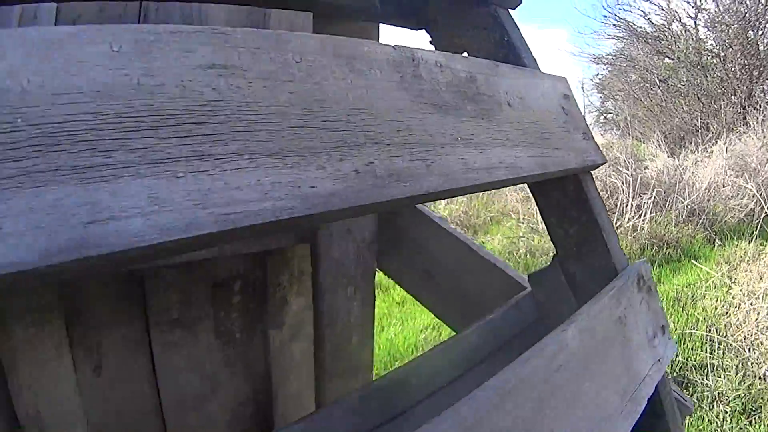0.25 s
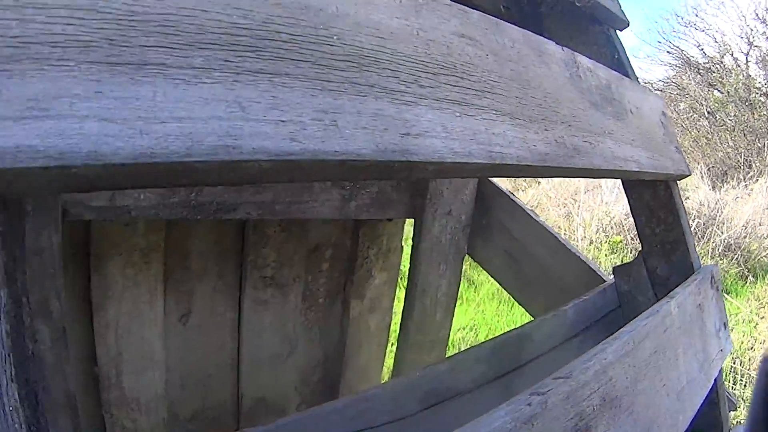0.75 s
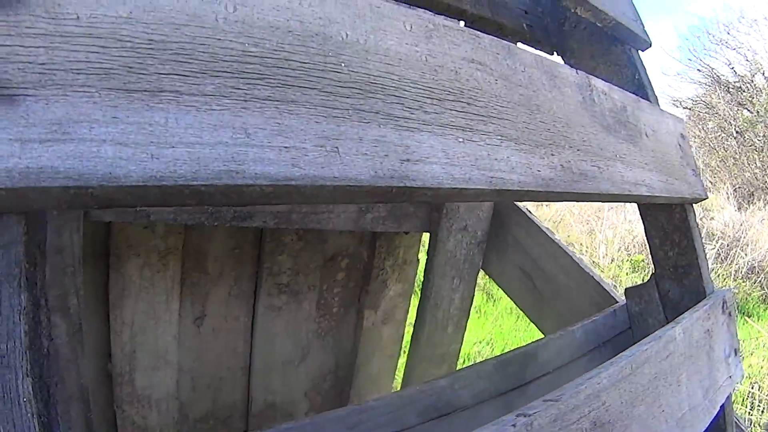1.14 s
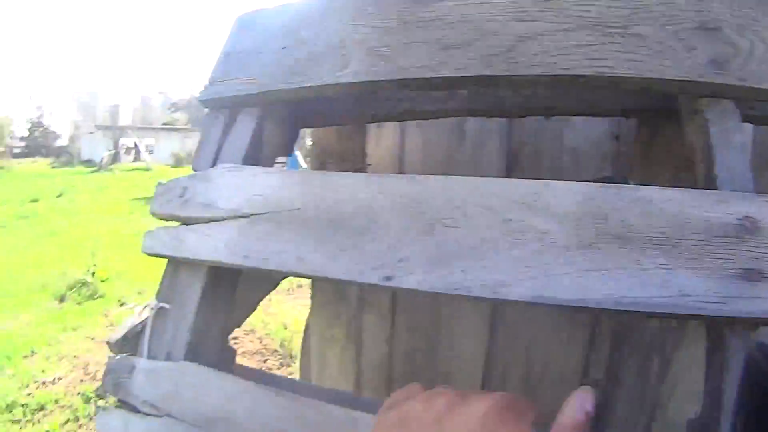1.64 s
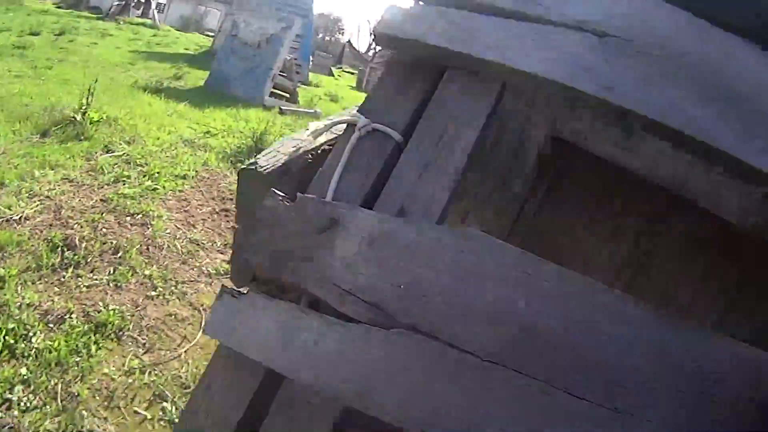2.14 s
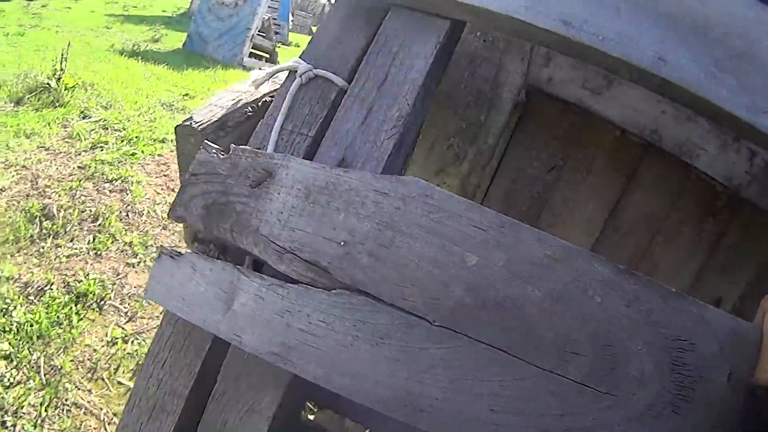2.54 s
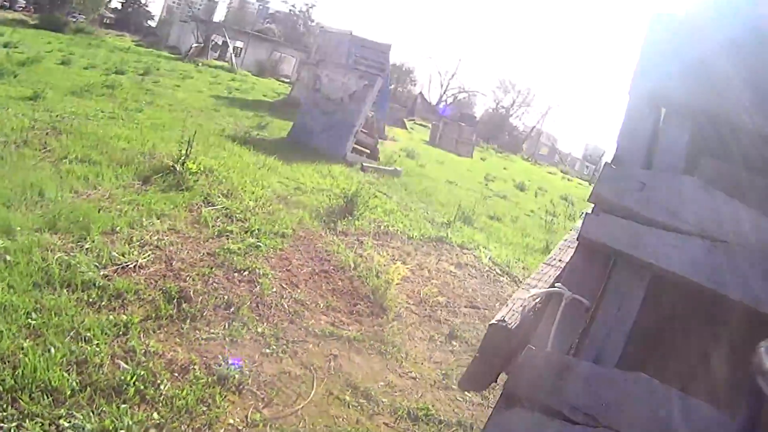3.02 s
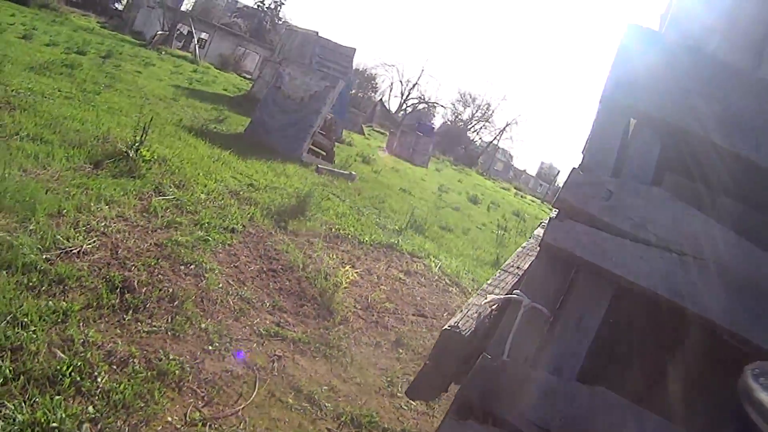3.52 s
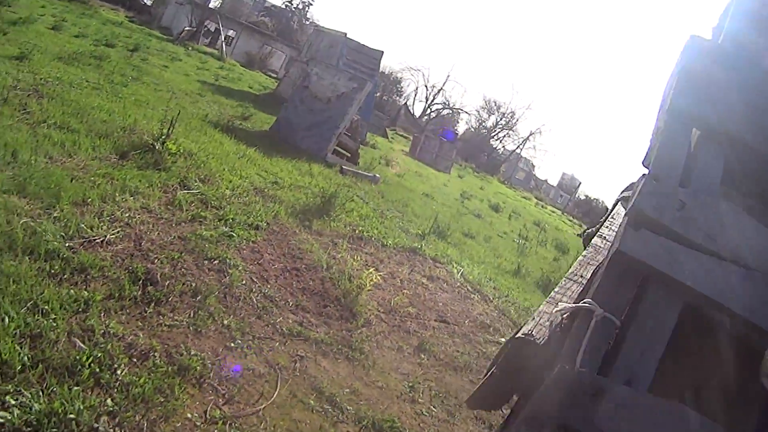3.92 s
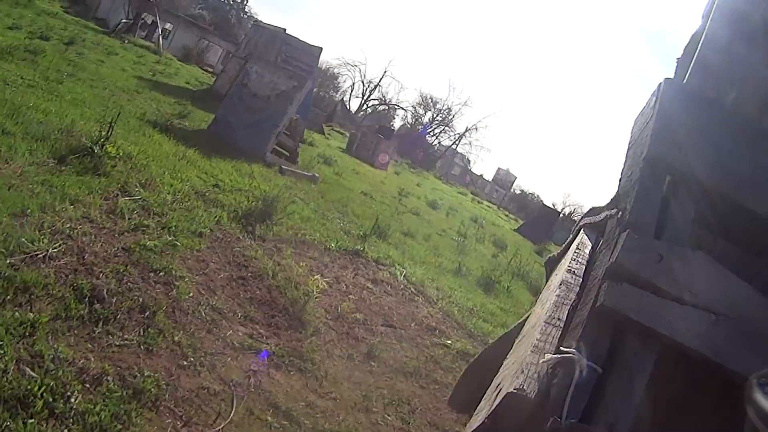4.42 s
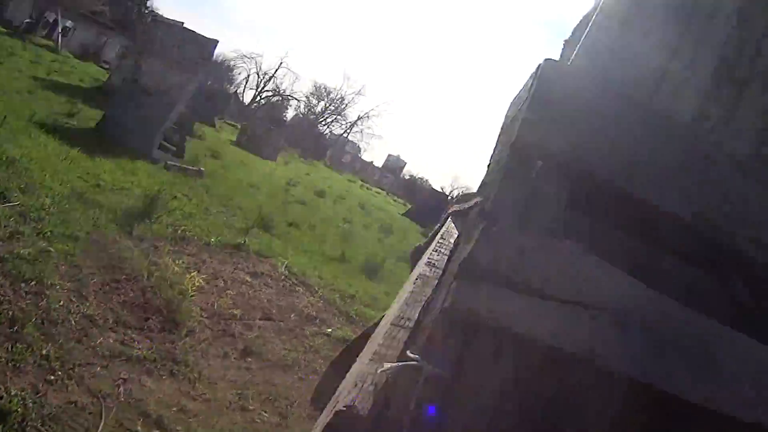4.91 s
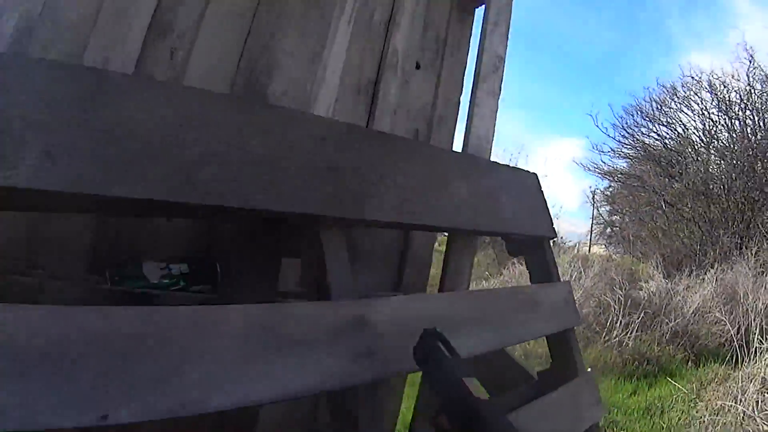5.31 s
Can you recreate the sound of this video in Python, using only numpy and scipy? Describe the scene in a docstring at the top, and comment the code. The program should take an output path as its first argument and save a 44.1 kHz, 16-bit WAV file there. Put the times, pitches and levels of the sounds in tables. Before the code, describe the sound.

Wind rumble, steady microphone hiss and cloth rustle run throughout, boxed in by a sealed head camera on an open field. In the first 0.7 seconds a dense cluster of hard knocks, dull thuds and dry ticks sounds as gear bumps wood, strongest around 0.3. It is calmer until about 1.4, with only faint bumps. From 1.5 to 3.0 the wind gusts, cloth rubs and knocks return, with a sharp clack near 2.3 and far shots ticking. At 3.2 a nearby air gun snaps with a low boom and quick echoes, followed by a heavy thud at 3.3. A second shot cracks at 3.7. Around 3.95 to 4.2 a short low hum rises and sinks, ending in a tiny falling squeak. The third, brighter shot comes at 4.4. Light bumps at 4.7 and 5.2 follow as the rustling and wind subside into hiss.

```python
"""A player with a sealed head camera crouches behind wooden pallets on an open field.
From the start microphone hiss, rumbling wind and rustling cloth run on as shaped noise.
Gear and pellets soon knock as ringing modes, dull thuds swell and fade, and far shots tick as noise bursts.
Later three nearby air guns snap, boom and echo; between the second and third of these shots
a short hum and a falling squeak glide by.
Two microphones hear it; noise filtered by case resonances makes the cloth and the shots ring."""
import sys
import numpy as np
from scipy import signal
from scipy.io import wavfile
from scipy.ndimage import uniform_filter1d

SR = 44100
rng = np.random.default_rng(int(sys.argv[2]) if len(sys.argv) > 2 else 0)


def to_wav(sig):
    """Store sig (one row per channel, or 1-D mono) as 16-bit WAV at the path in sys.argv[1].

    Samples outside -1..1 are clipped; the rate is SR.
    """
    pcm = np.clip(np.atleast_2d(sig), -1, 1) * 32767
    pcm = np.round(pcm).astype(np.int16)
    wavfile.write(sys.argv[1], SR, pcm.T)  # frames by channels


def convert_level_to_amplitude(level_db):
    """Map a level in decibels to its linear amplitude factor."""
    exponent = np.asarray(level_db, float) / 20
    return 10 ** exponent


N = 244975  # length in samples


def evened(x):
    """Scales to rms 1."""
    return x / np.sqrt(np.mean(x ** 2) + 1e-20)


def read(points, hz):
    """Reads a table of values against pitch, on a log-frequency axis."""
    table_hz, value = np.transpose(points)
    return np.interp(np.log(hz + 1), np.log(table_hz + 1), value)


def add(mix, s, sound):
    """Adds a two-channel sound at time s."""
    part = mix[:, round(s * SR):][:, :sound.shape[1]]
    part += sound[:, :part.shape[1]]


def ports(mid, side, pan_db=0.):
    """Sum and difference of the two microphone ports become left and right."""
    return np.array([(mid + side) * convert_level_to_amplitude(pan_db / 2), (mid - side) * convert_level_to_amplitude(-pan_db / 2)])


def noise(spectrum, patchy_db, size=1024):
    """Short-time spectrum of coloured noise with drifting louder and softer patches."""
    hz = np.fft.rfftfreq(size, 1 / SR)
    real, imaginary, patch = rng.standard_normal((N * 4 // size + 8, len(hz), 3)).T
    patch = uniform_filter1d(patch, size=5, axis=0)  # smooth over frequency
    patch = evened(uniform_filter1d(patch, size=6, axis=1))  # smooth over time
    return hz, (real + 1j * imaginary) * convert_level_to_amplitude(read(spectrum, hz)[:, None] + patchy_db * patch)


def to_wave(spectrum):
    """Turns a short-time spectrum back into samples."""
    size = 2 * (spectrum.shape[-2] - 1)
    return signal.istft(spectrum, nperseg=size, noverlap=size * 3 // 4)[1][..., :N]


# Colour of the steady hiss in the sum of the two ports.
# Each row: frequency in Hz, relative level in dB per Hz.
HISS_SUM = [(290, -38), (500, 4), (1600, 5.5), (2390, 0.5), (4680, -1), (5610, -1.5), (11000, -5.5),
            (14300, -107), (22000, -120)]
# The same for the difference of the ports.
# Each row: frequency in Hz, relative level in dB per Hz.
HISS_DIFFERENCE = [(240, -50), (400, -20), (706, -5), (1030, -6.5), (2490, -13), (3110, -15.5),
                   (11000, -29.5), (14300, -54), (22000, -120)]


def hiss():
    """The difference signal is boosted in the camera, so its hiss is the louder one."""
    mid = evened(to_wave(noise(HISS_SUM, patchy_db=2.5)[1]))
    side = evened(to_wave(noise(HISS_DIFFERENCE, patchy_db=2.7)[1]))
    return ports(convert_level_to_amplitude(-58.5) * mid, convert_level_to_amplitude(-55) * side)


def swells(rows, db):
    """Adds up the power of bell-shaped swells with their own rise and fall; returns a gain."""
    peak, rise, fall = np.transpose(rows)[:3, :, None]
    late = np.arange(N) / SR - peak
    u = late / np.where(late < 0, rise, fall)
    drop_db = 4.5 * u ** 2  # 4.5 dB down at one rise or fall time from the peak
    return np.sqrt((convert_level_to_amplitude(db[:, None] - drop_db) ** 2).sum(0))


# Colour of the wind heard through the case.
# Each row: frequency in Hz, relative level in dB per Hz.
WIND_COLOUR = [(12, -77), (20, -20.5), (70, -5), (172, -5), (241, 0.5), (307, -6), (370, -16.5), (426, -21),
               (600, -29.5), (780, -34.5), (1320, -120)]
# How strongly the wind differs between the ports, before its shared and separate parts are weighted.
# Each row: frequency in Hz, difference in dB relative to the sum.
WIND_DIFFERENCE = [(30, -12), (80, -18), (200, -15), (300, -11), (450, 6.5)]
# Gusts on top of a steady breeze.
# Each row: peak time in seconds, rise in seconds, fall in seconds, level in dB.
GUSTS = [(.55, .5, 0.97, -46), (1.05, 0.027, 0.052, -59), (1.58, .12, 0.1, -40), (2.4, 0.55, 0.32, -40),
         (3.35, 0.43, 0.23, -41), (3.92, 0.19, 0.052, -38), (4.27, 0.22, 0.072, -43),
         (4.85, 0.42, 0.16, -43.5)]


def wind():
    """Lumpy low noise; the two ports share most of it, slightly out of step."""
    hz, shared = noise(WIND_COLOUR, patchy_db=1.5, size=2048)
    separate = noise(WIND_COLOUR, patchy_db=2.5, size=2048)[1]
    out_of_step = 0.77 * np.exp(1j * 1.06) * shared  # turned by 1.06 rad
    side = convert_level_to_amplitude(read(WIND_DIFFERENCE, hz))[:, None] * (out_of_step + 0.3 * separate)
    mid, side = to_wave(np.array([shared, side]))
    breeze_db = -48
    strength = np.hypot(convert_level_to_amplitude(breeze_db), swells(GUSTS, np.transpose(GUSTS)[3]))
    return ports(mid, side) / mid.std() * strength


def scattered(shape, per_s, spread_db, share, length):
    """Noise roughened by sparse bursts of uneven size, each dying at a rate set by length in seconds."""
    size = convert_level_to_amplitude(spread_db * np.minimum(rng.exponential(1, shape[1]), 4))
    bursts = size * (rng.random(shape[1]) < per_s / SR)
    roughness = signal.lfilter([1], [1, -np.exp(-1 / (length * SR))], bursts)
    return rng.standard_normal(shape) * (1 + share * roughness)


def resonate(x, hz, width):
    """A resonant band of gain 1 at its centre."""
    return signal.lfilter(*signal.iirpeak(hz, hz / width, SR), x)


# Resonances of the camera case, the lowest first; a second pass scales each width.
# Each row: frequency in Hz, width of the first pass in Hz, level in dB.
CASE = [(1563, 330, -1.5), (3260, 710, 8), (4890, 720, 6.5), (5200, 540, 13), (7730, 1400, 2.5),
        (7230, 1200, -7.5)]
# Neighbours of the lowest resonance, filtered in the same way.
# Each row: frequency in Hz, width of the first pass in Hz, level in dB.
SNAP_PARTNERS = [(1709, 55, -6), (1050, 137, -10)]
# Resonances heard in the difference of the two ports.
# Each row: frequency in Hz, width in Hz, level in dB.
PORT_GAP = [(1640, 500, 1), (2800, 1550, -1), (5100, 1100, -5.5), (8000, 3000, -26)]


def through_case(x, snap_gain, bright_gain=0.69):
    """Airborne sound excites the case resonances; the gains weigh the lowest one and the upper ones."""
    x = signal.lfilter(*signal.butter(1, 9500, fs=SR), x)
    snap = sum(convert_level_to_amplitude(db) * resonate(resonate(x[0], hz, width), hz, 0.8 * width)
               for hz, width, db in [CASE[0]] + SNAP_PARTNERS)
    bright = sum(convert_level_to_amplitude(db) * resonate(resonate(x[0], hz, width), hz, 4 * width)
                 for hz, width, db in CASE[1:])
    side = sum(convert_level_to_amplitude(db) * resonate(x[1], hz, width) for hz, width, db in PORT_GAP) / bright.std()
    bright = evened(bright)
    mid = snap_gain * convert_level_to_amplitude(CASE[0][2]) * evened(snap) + bright_gain * bright
    return ports(mid, bright_gain * side), bright


# The player's moves, each a swell of rubbing cloth and straps; levels are those fed to the case.
# Each row: peak time in seconds, rise in seconds, fall in seconds, level in dB,
# upper resonances in dB relative to that level.
MOVES = [(.3, 0.17, 0.21, -52, -19), (.55, 0.094, 0.14, -54.5, -9), (1.6, 0.14, 0.068, -53, -6),
         (1.9, 0.13, 0.27, -52.5, -9), (2.15, 0.12, 0.19, -49, -8), (2.8, 0.25, 0.33, -55, -8.5),
         (3.12, 0.23, 0.26, -51, -5), (4.3, 0.17, 0.088, -50.5, -5.5), (4.75, 0.14, 0.48, -58, -17),
         (5.3, 0.37, 0.62, -66, -1)]


def rustle():
    """Noise with small crackles in it, rising and falling with the player's moves."""
    rub = scattered((2, N), 140, spread_db=5.0, share=0.44, length=0.00068)
    db, upper_db = np.transpose(MOVES)[3:]
    return through_case(rub, swells(MOVES, db), swells(MOVES, db + upper_db))[0]


# Knocks on wood and gear; the level is before a common 3 dB lift.
# Each row: time in seconds, level in dB, edge modes in dB and snap modes in dB relative to it,
# contact time in ms (at least 1 is used).
KNOCKS = [(0.012, -41.5, -20, -14, 4.2), (.136, -37, -18, 4.5, 4), (0.179, -42, -11, -22, 8.4),
          (0.283, -15, -14, -13.5, 8.1), (0.314, -45.5, 19, 3, 7.1), (0.343, -13.5, -13, -13, 2.58),
          (0.371, -26, -28, -30, 6.3), (.415, -40.5, -11, -9, 3.2), (0.632, -32, -5.5, -30, 8.6),
          (0.725, -46, -10, -6, 3.1), (1.419, -54, 0, 5, 7.7), (1.4927, -21, -4, -9, 9.5),
          (1.504, -34, 2, -16, 3.3), (1.542, -47.5, 23, 7, 5.5), (1.756, -36.5, 4, -0.5, 9.9),
          (1.787, -42.5, -12, -1, 2.2), (1.834, -39.5, 5.5, -11, 7.1), (1.962, -49, 0, 15, 8.2),
          (1.97, -51.5, 12, 12, 2.9), (2.203, -25, -17, 1, 3.5), (2.297, -14, -10.5, -8, 2.4),
          (2.357, -48, 18.5, 9.5, 6.8), (2.443, -47, -14, -5.5, 8.4), (2.588, -38.5, -45, -17, 6),
          (2.737, -44.5, -14, -7, 10), (2.777, -28, -7, -2.5, 3.83), (3.024, -25, -6, -12.5, 8.95),
          (3.303, -34.5, -21, -9, 7.5), (3.312, -34, -14, -34, 7.6), (3.378, -27, -11, -25, 3.38),
          (3.883, -23, -8, -16.5, 7.4), (3.894, -37, -20, -7, 8.5), (3.924, -40, -1, -8, 2.5),
          (4.739, -43, -1, -13, 9.2), (4.895, -43.5, -24, -23, 6.5), (5.148, -28, -4, -18, 6.3),
          (5.238, -40, -25, -30, 5)]
# The modes a knock rings with; pitch and level vary a little from knock to knock.
# Each row: frequency in Hz, level in dB, time to fall 60 dB in seconds,
# difference of the ports in dB relative to their sum, phase of that difference in rad.
KNOCK_MODES = [(240, -9, 0.042, -33, 2.3), (289, -6.5, 0.036, -1, 0.38), (393.5, -3.5, 0.029, -3.5, 2.95),
               (532, -5.5, 0.024, 1, 1.4), (663, -11, 0.015, 0, 1.3), (860, -14.5, 0.027, -5, 1.5),
               (1136, -14.5, 0.041, -7, 1.8), (1250, -30, 0.019, -2, 1.5), (1600, -11, 0.045, -5, 1.3),
               (1727, 1, 0.011, -7.5, 1.3), (2100, -57, 0.0057, 25, 2.1), (2530, 2.5, 0.0075, 12, 1),
               (3313, 5.5, 0.016, -12, 1.1), (4230, -6, 0.0053, -6, 1.5)]
# The frequencies in Hz that part the body, edge, snap and click modes.
GROUP_EDGES = (750, 1400, 2400)


def knocks(mix):
    """A blow is a ragged run of small contacts with one main press among them; all ring the same modes."""
    t = np.arange(round(.1 * SR)) / SR
    hz, mode_db, t60, side_db, turn = np.transpose(KNOCK_MODES)[:, :, None]
    group = np.digitize(hz, GROUP_EDGES)
    decay = (1 - np.exp(-t * hz / 0.87)) * convert_level_to_amplitude(-60 * t / t60)  # builds up over about a cycle
    late = np.clip(np.log2(hz / 300) / 4.0, .4, 1)  # higher modes are reached later in the contact
    draws = rng.random((len(KNOCKS), 2, len(KNOCK_MODES), 1))
    grit = rng.standard_normal((len(KNOCKS), len(KNOCK_MODES), 1300)) ** 3
    for (s, db, edge_db, snap_db, contact_ms), (tune, spot), rattle in zip(KNOCKS, draws, grit):
        u = t[:1300] * 1000 / max(contact_ms, 1)  # time in contact lengths
        force = rattle * np.exp(-((u - late) / 0.59) ** 2)
        press_at = abs(u - late).argmin(1)[:, None]
        np.put_along_axis(force, press_at, 43, axis=1)  # the main press among the small contacts

        phase = 2 * np.pi * hz * (1 + 0.085 * (tune - .5)) * t
        ring = decay * np.array([np.sin(phase), convert_level_to_amplitude(side_db) * np.sin(phase + turn)])
        ring = signal.fftconvolve(ring, force[None], axes=2)

        click_db = snap_db - 13.5 - max(edge_db, 0)  # blows on an edge click less
        level_db = db + mode_db + np.array([0, edge_db, snap_db, click_db])[group] + 5 * (spot - .5)
        peak = abs(ring[0]).max(1, keepdims=True)
        mid, side = (ring * convert_level_to_amplitude(level_db + 3.0) / peak).sum(1)
        highpass = signal.butter(2, 130, "high", fs=SR)
        add(mix, s - .0007, signal.lfilter(*highpass, ports(mid, side)))


def boom(db, hz, pan_db, peak, fall, overtone_db):
    """The case's lowest ring swells for a few cycles and is damped out; the right port lags."""
    t = np.arange(round(.12 * SR)) / SR
    swell = (1 - np.exp(-t * hz / 0.18)) * np.exp(-((t - peak) / fall) ** 2)
    phase = 2 * np.pi * hz * t - np.array([[0], [.6]])  # left, right
    ring = -np.sin(phase) + convert_level_to_amplitude(overtone_db) * swell * np.cos(1.964 * phase)
    return convert_level_to_amplitude(db) * swell * ring * convert_level_to_amplitude(np.array([[pan_db / 2], [-pan_db / 2]]))


# Dull thuds that only stir the case's lowest ring.
# Each row: time in seconds, level in dB, pitch in Hz, left over right in dB.
THUDS = [(0.116, -18, 187, 3), (0.128, -21, 248, 4), (0.213, -27, 204, 2.5), (0.358, -19, 207, 1),
         (0.585, -24, 235, 2.5), (1.043, -28, 240, 1), (1.376, -29.5, 268, 0), (1.421, -24.5, 231, 2),
         (1.665, -28.5, 184, 0), (1.831, -30.5, 240, 1.5), (2.364, -27, 197, -3), (3.297, -30, 256, 9),
         (3.313, -12, 242, 5.5), (3.351, -31.5, 225, 15), (3.487, -29.5, 249, 0), (3.993, -29.5, 226, -1),
         (4.118, -27, 216, 2), (4.545, -32.5, 243, 6), (4.741, -22.5, 256, 2.5), (5.172, -35, 205, 1.5)]


def thuds(mix):
    """Soft bumps against the helmet, each a short damped low ring."""
    for s, db, hz, pan_db in THUDS:
        add(mix, s - .001, boom(db, hz, pan_db, peak=0.0047, fall=0.0081, overtone_db=-36.5))


def crack(db, snap_db, t60, draw, leak_db):
    """A steep front, then a burst of noise, seen through the case; some treble leaks past its resonances."""
    t = np.arange(draw.shape[1]) / SR
    front = 2.43 * (t == 0)
    burst = draw * convert_level_to_amplitude(-60 * t / t60) + front
    sound, bright = through_case(burst, convert_level_to_amplitude(snap_db))
    treble = signal.lfilter(*signal.butter(2, 3800, "high", fs=SR), burst[0])
    leak = evened(treble) * convert_level_to_amplitude(leak_db)
    return (sound + leak) / abs(bright).max() * convert_level_to_amplitude(db)


# How the open field dies away.
# Each row: frequency in Hz, time to fall 60 dB in seconds.
FIELD = [(1000, 1), (2800, 0.54), (5200, 0.52), (9000, 0.4)]


def field_tail(db):
    """Scattered, separate reflections off walls and pallets; each band dies at its own speed."""
    reflections = scattered((2, SR // 2), 130, spread_db=6.0, share=0.52, length=0.001)
    sound = through_case(reflections, convert_level_to_amplitude(-11.5))[0]
    hz, t, spectrum = signal.stft(sound, SR, nperseg=256)
    decay = convert_level_to_amplitude(-60 * t / read(FIELD, hz + 1)[:, None])
    tail = signal.istft(spectrum * decay, SR, nperseg=256)[1]
    fade_in = np.minimum(np.arange(tail.shape[1]) / SR / 0.004, 1)
    return convert_level_to_amplitude(db) * tail * fade_in


# Far shots and pellet ticks.
# Each row: time in seconds, level in dB, mid snap in dB relative to it before a common 1 dB lift.
TICKS = [(.1158, -30, 2.5), (0.1383, -23, 4), (0.168, -35.5, 1), (0.2635, -32, 6), (0.2856, -34.5, -8),
         (0.294, -34.5, 1), (.321, -45, 5), (.34, -26, 1), (.364, -31.5, -4), (.416, -34.5, 4),
         (0.7304, -39.5, 11.5), (1.011, -41, -1), (1.497, -32.5, 8), (1.5681, -38, 6), (1.6247, -43, -6),
         (1.6586, -38.5, 0), (1.674, -35.5, -2), (1.8102, -34, 4.5), (1.837, -30, -18),
         (1.9686, -31.5, 3.5), (1.985, -34.5, -4), (2.0787, -26.5, -4), (2.163, -26.5, -12),
         (2.1812, -35, -12), (2.202, -33, 17.5), (2.297, -29.5, 3), (2.5253, -39, -12), (2.7666, -38, -4),
         (2.7765, -42, 1), (3.485, -35, -5), (3.8808, -41, 7), (3.9149, -36, 5.5), (4.119, -36, 3),
         (4.2223, -44, -17), (4.253, -31.5, -11), (4.3315, -36.5, -1), (4.357, -38.5, -18), (4.689, -41, 0),
         (4.8247, -38.5, -4), (5.3183, -37, -26)]


def ticks(mix):
    """Short dry cracks with the field answering."""
    draws = rng.standard_normal((len(TICKS), 2, 900))
    for (s, db, snap_db), draw in zip(TICKS, draws):
        add(mix, s, crack(db, snap_db + 1, 0.02, draw, leak_db=-11))
        add(mix, s + 0.0017, field_tail(db - 22))


# Near shots; the boom level is the base for a case boom and a softer blast.
# Each row: time in seconds, crack level in dB, boom level in dB, mid snap in dB relative to the crack,
# left over right of the case boom in dB.
SHOTS = [(3.1937, -17, -15, -2, 6), (3.718, -17, -15, -2, 6), (4.4389, -18.5, -16.5, 2.5, 6)]
# Echoes that follow each near crack.
# Each row: delay in seconds, level in dB relative to the crack.
ECHOES = [(.009, -8), (.018, -16), (.0285, -5.5), (.057, -15), (.101, -19)]


def shots(mix):
    """Crack, echoes, field tail, the boom of the case and the low push of the blast."""
    for s, db, boom_db, snap_db, pan_db in SHOTS:
        for delay, echo_db in [(0, 0)] + ECHOES:
            dull_db = -8 * (delay > 0)  # echoes have less of the mid snap
            draw = rng.standard_normal((2, 900))
            add(mix, s + delay, crack(db + echo_db, snap_db + dull_db, 0.017, draw, leak_db=-8.5))
        add(mix, s + 0.0025, field_tail(db - 21))
        case_boom = boom(boom_db + 3.0, 239, pan_db, peak=0.0045, fall=0.017, overtone_db=-24.5)
        blast = boom(boom_db - 6.0, 167, 0, peak=0.0093, fall=0.0066, overtone_db=-45)
        add(mix, s + .0018, case_boom)
        add(mix, s + .0018, blast)


def curve(rows, axis):
    """One column of a time table at every sample."""
    rows = np.array(rows)
    return np.interp(np.arange(N) / SR, rows[:, 0], rows[:, axis])


def glide(rows, fade, side_db):
    """A near-pure tone that follows its pitch curve, fading in and out over fade seconds."""
    t = np.arange(N) / SR
    gate = np.clip(np.minimum(t - rows[0][0], rows[-1][0] - t) / fade, 0, 1)
    phase = 2 * np.pi * np.cumsum(curve(rows, axis=1)) / SR
    tone = ports(np.sin(phase), convert_level_to_amplitude(side_db) * np.sin(phase + .8))
    return np.sqrt(2) * gate * convert_level_to_amplitude(curve(rows, axis=2)) * tone


# A low gliding hum.
# Each row: time in seconds, pitch in Hz, rms level in dB before the end fades.
HUM = [(3.95, 232, -44), (3.996, 233.4, -36.5), (4.078, 256, -37.5), (4.14, 241.3, -35.5),
       (4.19, 240, -35.5)]


def hum():
    """A low tone whose pitch rises and then sinks again."""
    return glide(HUM, fade=0.016, side_db=-12)


# A brief squeak falling in pitch.
# Each row: time in seconds, pitch in Hz, rms level in dB before the end fades.
SQUEAK = [(4.166, 5800, -60), (4.174, 5360, -53), (4.184, 5270, -51), (4.191, 5200, -60)]


def squeak():
    """A high tone that slides down within a few hundredths of a second."""
    return glide(SQUEAK, fade=.003, side_db=-16)


def scene():
    """All sources at the two ports."""
    events = np.zeros((2, N))
    for play in (knocks, thuds, ticks, shots):
        play(events)
    return hiss() + wind() + rustle() + events + hum() + squeak()


def low_pass(x):
    """Removes everything above the highest recorded frequency."""
    return signal.sosfilt(signal.butter(12, 11940, fs=SR, output="sos"), x)


def record(dry):
    """The camera's band limit: a steep low-pass at 11150 Hz takes off the top treble."""
    lowpass = signal.firwin(255, 11150, window=("kaiser", 7), fs=SR)
    limited = signal.oaconvolve(dry, lowpass[None], "same")
    return low_pass(limited)


dry = scene()
out = record(dry)
to_wav(out)
```